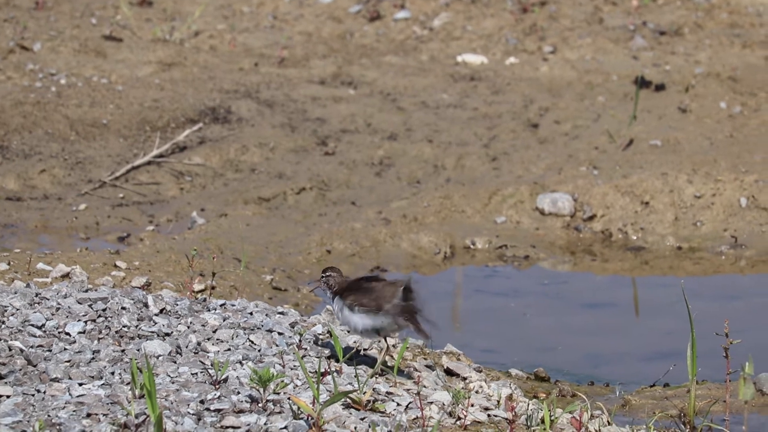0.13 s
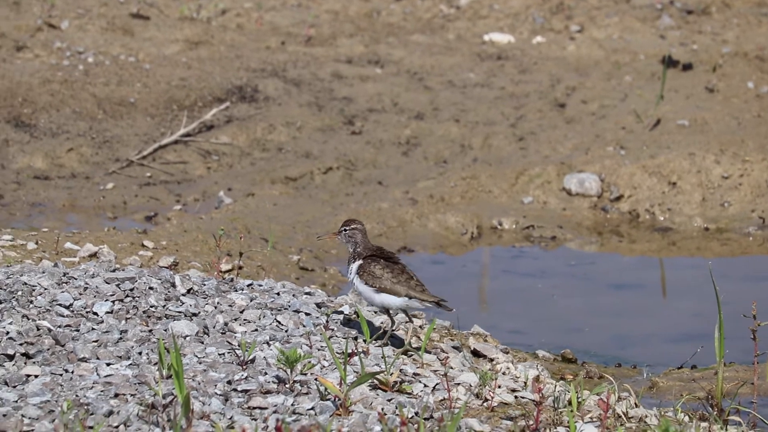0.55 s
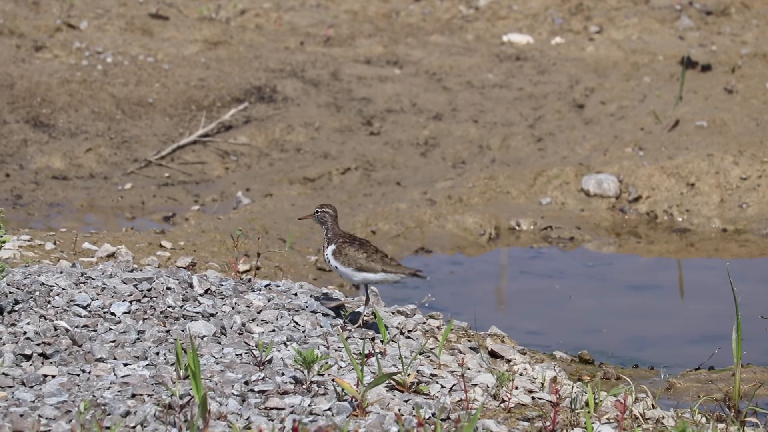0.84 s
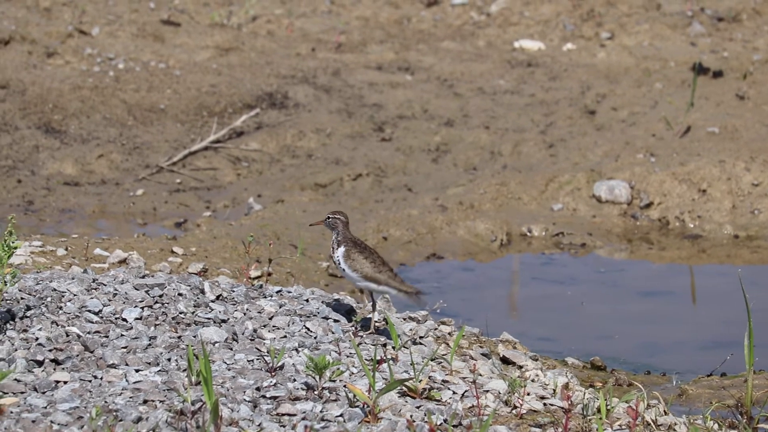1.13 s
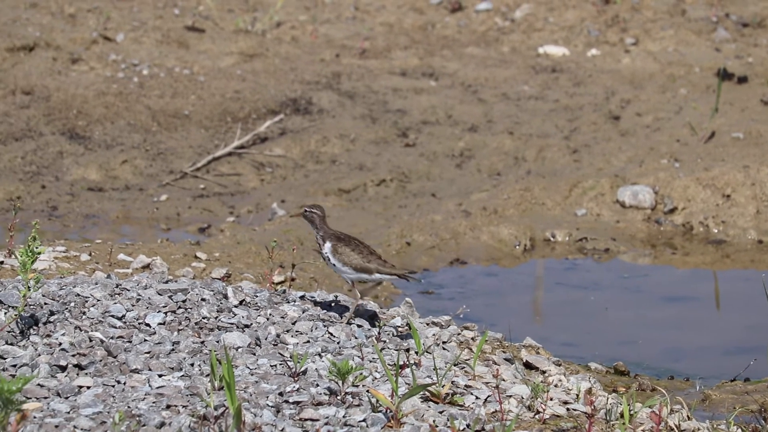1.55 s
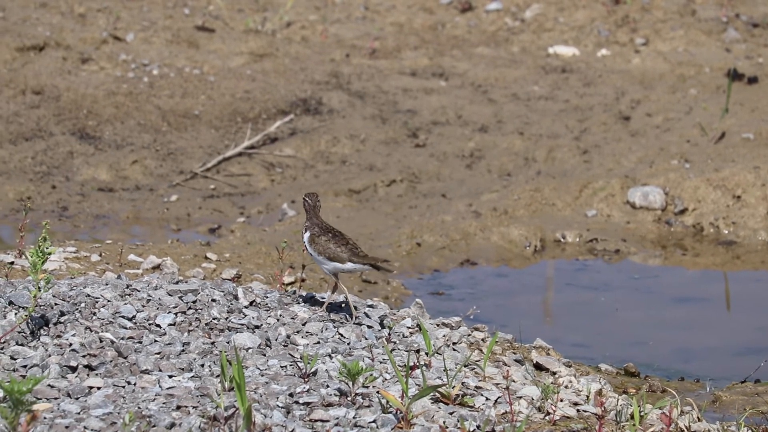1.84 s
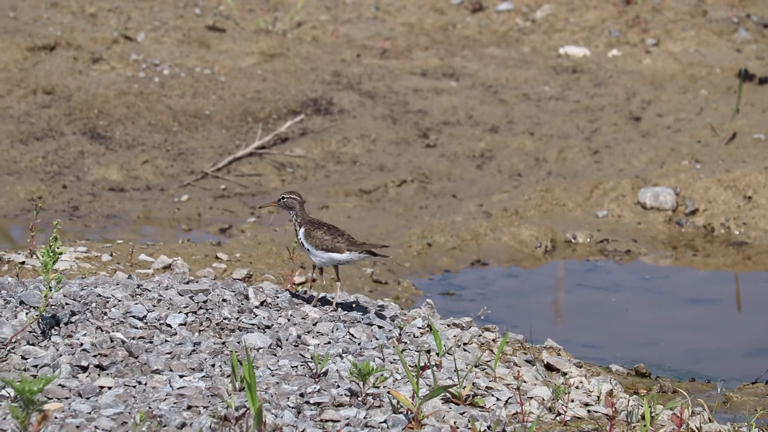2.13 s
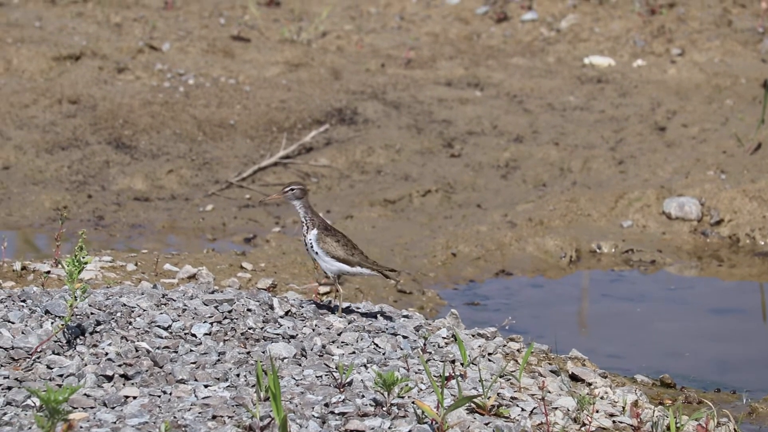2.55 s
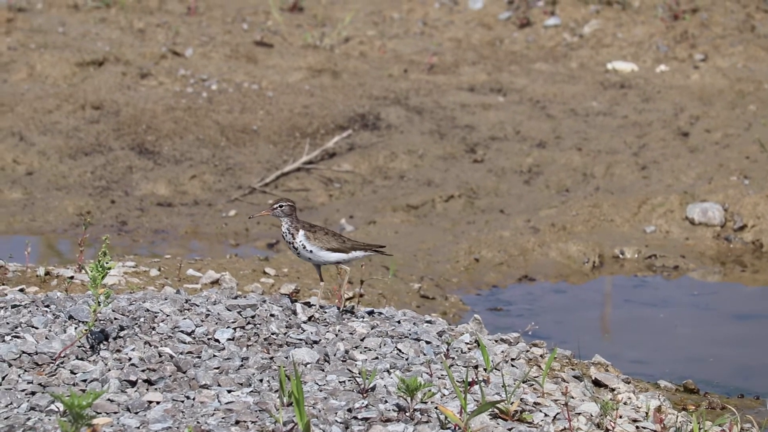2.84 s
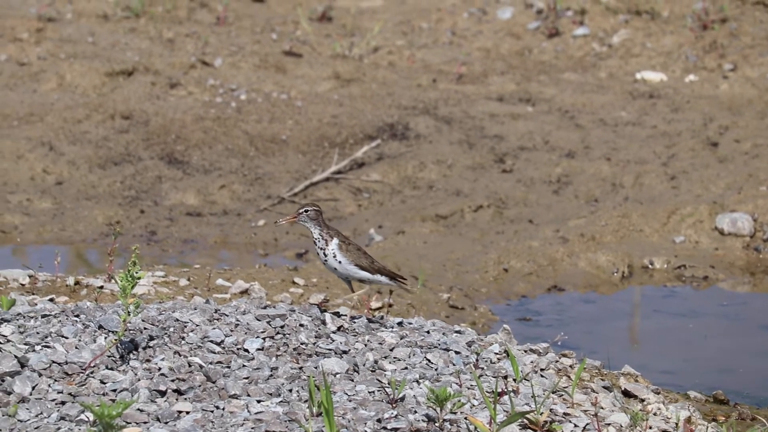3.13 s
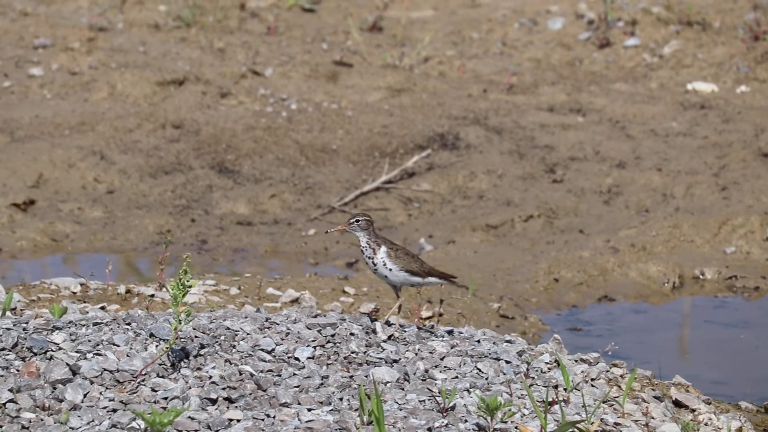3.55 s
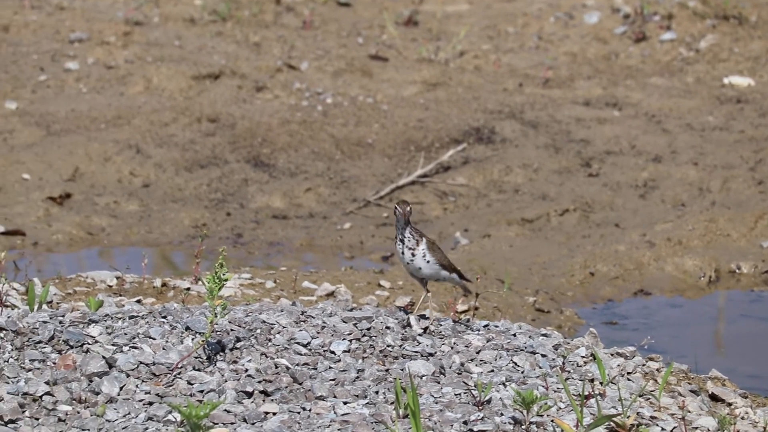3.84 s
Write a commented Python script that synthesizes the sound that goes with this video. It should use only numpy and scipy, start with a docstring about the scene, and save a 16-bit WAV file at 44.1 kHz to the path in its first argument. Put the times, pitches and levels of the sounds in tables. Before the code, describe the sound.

A sandpiper gives brief, pure, rising peeps at about 0.2, 0.5, 0.7, 1.6, 2.0, 2.5, 3.3 and 3.4 seconds, the last ones loudest; the 1.6 peep cracks higher. Distant songbirds make a fast trill from 0.05 to 0.5, a short buzz near 0.95, then scattered slurs and whistles. Thin insect-like chirps repeat over low rumble, hiss and a light breeze easing after 2 seconds.

```python
"""A sandpiper on a gravel bank by a pool gives eight sharp, rising peeps; one cracks briefly into a higher register.
Each peep is three gliding harmonics with a short upward flick at its start and reflections from the bank.
Farther off, songbirds trill, slur and buzz as frequency-swept sines, and a high pulsed chirp repeats like an insect's.
Under them lie a low distant rumble, faint hums, hiss and a light breeze that eases halfway: coloured noise and sines."""
import sys
import numpy as np
from scipy import signal
from scipy.fft import rfft, irfft
from scipy.io import wavfile
from scipy.ndimage import map_coordinates

SR = 44100
rng = np.random.default_rng(int(sys.argv[2]) if len(sys.argv) > 2 else 0)


def master_out(mix):
    """Clip the mix to full scale and print it as 16-bit PCM to the path in sys.argv[1]."""
    frames = np.transpose(np.atleast_2d(mix))
    ceiling = np.clip(frames, -1, 1)
    pcm = np.round(ceiling * 32767).astype(np.int16)
    wavfile.write(sys.argv[1], SR, pcm)


N = 176400  # length in samples: 4 s

# Noise colours, each scaled to rms 1 in use: pitch_hz, relative_level_db
RUMBLE_COLOUR = [(20, -21), (40, -17), (54, -7), (69, 4.5), (92, -5), (125, -4.5), (160, 2), (200, -2),
                 (270, -5.5), (340, -11), (450, -22), (900, -64)]
BREEZE_COLOUR = [(240, -26), (400, -4.5), (834, -3.5), (1630, 1), (2250, 0.5), (4630, -15.5), (6190, -22),
                 (7910, -31.5), (8930, -44), (12700, -45), (15500, -43)]
HISS_COLOUR = [(300, -4), (600, 6), (1000, 1), (2600, -2), (3600, -11), (5000, -15.5), (6500, -22),
               (7400, -13.5), (8200, -14.5), (9200, -24), (10500, -24), (13000, -22.5), (15500, -30.5)]
# Stereo width of the noises: pitch_hz, side_over_mid_db
AIR_WIDTH = [(300, -13), (600, -9), (1200, -3.5), (2400, -5), (4500, -1), (8000, 0.5), (13000, 1.5)]
RUMBLE_WIDTH = [(150, -28), (350, -16)]
# Level of the breeze over time, before its waver: time_s, level_db
BREEZE_LEVEL = [(0, -40), (.4, -44), (.75, -41.5), (1.4, -44.5), (1.9, -41.5), (2.3, -49), (3.2, -53),
                (4, -50.5)]
# Swell added to the rumble's level: time_s, swell_db
RUMBLE_SWELL = [(0, 2.5), (.5, 0), (.85, 2), (1.3, 0.5), (2.5, -1.5), (3.4, -1), (4, 0.5)]
# Faint distant hums: pitch_hz, level_db
HUMS = [(549.1, -63.5), (1658, -63.5)]
RUMBLE_DB, HISS_DB = -36.5, -47.5
BREEZE_PAN_DB, HISS_PAN_DB = -4, 1  # left over right
TOP_HZ = 15700

# Diffuse reflections: decay by 60 dB, time to build up, level against the dry songs
AIR_T60_S, AIR_DELAY_S, SONG_AIR_DB = 0.16, 0.0098, -6.5

# High pulsed chirps: start_s
INSECT_STARTS = [.26, .57, 1.21, 1.51, 1.79, 2.09, 2.38, 2.67, 2.95, 3.22, 3.51, 3.779]
INSECT_LENGTH_S, INSECT_HZ, INSECT_PULSE_HZ, INSECT_DB = 0.09, 7750, 125, -51.5

# Fast trill: start, first step, how much the step shortens by the last note, note length
TRILL_S, TRILL_STEP_S, TRILL_QUICKEN_S, TRILL_NOTE_S = 0.055, 0.0201, 0.0032, 0.018
# Top pitch, depth of fall and level at the first, middle and last note
TRILL_TOP_HZ, TRILL_FALL_HZ, TRILL_DB = [5330, 5300, 5130], [1480, 1400, 850], [-44, -40, -39.5]
TRILL_SCATTER_HZ, TRILL_SCATTER_DB, TRILL_PAN_DB = 35, 1.2, 4
TRILL_ARCH = 0.42  # share of a note spent rising, reached by the last note

# Wavering whistles: start_s, length_s, level_db, pitches_hz at even steps
WARBLES = [(0.565, 0.12, -41, [3200, 3620, 3810, 3880, 4130, 4550, 4470]),
           (2.125, 0.11, -45.5, [3340, 3850, 3860, 3820, 3690, 3600, 3470]),
           (2.382, .135, -44.5, [3590, 3774, 3830, 3740, 3510, 3364, 3350]),
           (2.753, 0.095, -44.5, [3400, 3860, 3930, 4090, 4190, 4030, 3440, 4150])]
# Release is the share of the whistle spent fading
WARBLE_ATTACK_S, WARBLE_RELEASE, WARBLE_PAN_DB = 0.02, 0.38, 8.5

# Songbird notes: start_s, length_s, first_hz, middle_hz, last_hz, level_db, buzz_depth_hz, left_over_right_db
SONG_NOTES = [(0, 0.13, 7630, 8210, 7980, -46.5, 60, 1), (0.082, .13, 8020, 8120, 8500, -48.5, 60, 1),
              (0.207, 0.034, 8800, 9200, 8900, -50.5, 150, 0),
              (0.289, 0.14, 3260, 3910, 4680, -44.5, 0, 8.5), (0.511, 0.033, 4620, 4440, 4230, -40, 304, 4),
              (0.538, 0.026, 3700, 3720, 3480, -38, 2, 14), (0.641, 0.044, 7020, 6240, 5160, -46.5, 1, 14),
              (0.654, 0.13, 6660, 6650, 6050, -46.5, 170, 6), (.772, 0.022, 3530, 3000, 2800, -43.5, 0, 18),
              (0.794, 0.025, 4180, 3840, 3700, -49, 1, 6), (.839, 0.0064, 4900, 5800, 6600, -44, 0, 9),
              (0.845, 0.029, 6600, 7000, 7560, -54, -2, 16), (0.849, 0.28, 9100, 9180, 8580, -55.5, 325, 5),
              (0.854, 0.14, 8600, 8050, 8000, -47.5, 52, 1), (1.051, .2, 9000, 8510, 8700, -56, 260, 2),
              (.998, 0.031, 4773, 4790, 4820, -42, 0, 0), (1.055, 0.021, 3360, 3110, 2870, -49.5, -10, 16),
              (0.983, 0.02, 4370, 3900, 3860, -46, 0, 10), (1.039, 0.0064, 7460, 5770, 4700, -50, 0, 8),
              (1.125, 0.039, 5170, 6600, 7560, -52.5, 3, 15), (1.157, 0.026, 5340, 4100, 3800, -45.5, 7, 9),
              (1.204, 0.016, 5820, 4670, 3600, -47.5, 0, 4), (1.28, 0.19, 3240, 3183, 3280, -50, 45, 20),
              (1.446, 0.043, 5620, 4600, 3680, -41, 124, 6), (1.602, 0.039, 4210, 3860, 3170, -44, 0, 12),
              (1.738, 0.05, 3350, 3800, 4900, -43.5, 2, 9), (1.845, 0.042, 3300, 3850, 4740, -40.5, 0, 10),
              (2.299, 0.031, 8160, 5560, 4300, -49, 0, 9), (2.375, 0.014, 3540, 4100, 4500, -50, 5, 8),
              (2.663, 0.031, 7370, 5270, 4500, -51, 0, 7), (2.741, 0.024, 3400, 4260, 4330, -50, 0, 8),
              (2.79, 0.13, 8300, 8100, 7960, -62.5, 220, 3),
              (2.949, 0.076, 8770, 7650, 7440, -57.5, 220, 3),
              (3.014, 0.061, 6370, 5760, 5300, -55, 156, 5), (3.202, 0.13, 2980, 3107, 3440, -52.5, 50, 8),
              (3.426, 0.068, 6150, 5370, 4700, -52.5, 301, 6),
              (3.577, 0.027, 3200, 3500, 3750, -49.5, 11, 11), (3.671, .1, 5770, 4590, 4180, -51.5, 320, 5),
              (3.786, 0.27, 7750, 8000, 8060, -56.5, 263, 1)]
BUZZ_HZ, BUZZ_UNEVEN, BUZZ_ROUGH = 182, 0.11, 0.28  # vibrato rate, scatter of its rate, roughness per depth
SONG_EDGE = 0.24  # share of a note spent fading in, and out

# A swelling buzz that tightens into a whistle
ZEE_S, ZEE_LENGTH_S, ZEE_FROM_HZ, ZEE_TO_HZ, ZEE_DB = 0.918, 0.083, 4660, 4810, -31.5
ZEE_BUZZ_HZ, ZEE_UNEVEN, ZEE_DEPTH_HZ, ZEE_SETTLE_S = 322, 0.06, 900, 0.023  # uneven: scatter of the rate

# Sandpiper peeps, pitch before scoop and droop:
# start_s, length_s, crest_time_s, open_hz, crest_hz, open_db, crest_db, second_harmonic_db,
# third_harmonic_db, flick_db
PEEPS = [(.237, .058, 0.036, 4400, 4586, -27.5, -26.5, -42, -55, -43),
         (0.537, 0.084, 0.07, 4080, 4776, -28.5, -22, -44, -52, -35),
         (0.711, 0.099, 0.082, 3860, 4690, -33.5, -20, -45, -58, -36.5),
         (1.555, .068, 0.054, 4140, 4390, -25, -20, -47, -59, -41),
         (1.977, 0.073, 0.057, 4140, 4453, -21, -17.5, -47.5, -54, -38.5),
         (2.511, 0.074, 0.048, 4240, 4480, -19, -15, -48, -48, -39.5),
         (3.27, 0.077, 0.064, 4100, 4464, -19, -12, -56, -47, -40.5),
         (3.443, 0.1, .09, 3840, 4630, -23.5, -11, -53, -61, -42)]
# Balance of the three harmonics: left_over_right_db
PEEP_PAN_DB = [0.2, -2.2, -3]
CREST_S, PITCH_RAMP, LEVEL_RAMP = 0.019, 0.46, 0.73  # crest width; shares of the rise made as a steady climb
SCOOP_HZ, SCOOP_S = 480, 0.0023  # each peep slides up from below
DROOP_HZ, DROOP_S = 230, 0.0036  # and hooks down as it ends
ATTACK_S, RELEASE_S = 0.001162, 0.016
JITTER, SHIMMER_DB, OVERTONE_SHIMMER_DB = 0.0017, 1, 1.5  # jitter is a share of the pitch
STEADY_ABOVE_DB, WAVER_PER_DB = -20, 0.16  # a softer voice wavers more
# Upward flick as the voice starts; its overtone is relative to the peep's opening level
FLICK_S, FLICK_FROM_HZ, FLICK_TO_HZ = 0.009, 1650, 3530
FLICK_ROUGH, FLICK_OVERTONE_DB = 0.1, -18
# Jump of register: its two harmonics, and the time to change over
CRACK_S, CRACK_LENGTH_S, CRACK_HZ, CRACK_SAG_HZ = 1.567, 0.015, 5920, 150
CRACK_DB, CRACK_EDGE_S = [-26, -47], 0.0016
STRAIN_HZ, STRAIN_S = 450, 0.006  # the pitch strains upward towards the jump
BANK_ECHO_S, BANK_ECHO_DB, PEEP_AIR_DB = 0.012, -23.5, -22
RIGHT_LAG_S = 1.7e-5  # the near bird reaches the right microphone a little later


def undb(db):
    """Decibels to gain."""
    return 10 ** (np.asarray(db) / 20)


def pan(db):
    """Left and right gains from a left-over-right balance."""
    return undb([[db / 2], [-db / 2]])


def curve(points, at):
    """Straight lines through the points."""
    return np.interp(at, *np.array(points, float).T)


def wander(hz, size):
    """Smooth chance with a spread near 1, drawn afresh hz times a second."""
    knots = rng.standard_normal(int(size * hz / SR) + 4)
    return map_coordinates(knots, [np.arange(size) * hz / SR], mode="mirror")


def ages(length):
    """Time since the start of a sound."""
    return np.arange(int(max(length, 0.002) * SR)) / SR


def gate(age, length, attack, release):
    """Rounded attack, hold, rounded release."""
    rise = np.sin(np.pi / 2 * np.clip(age / attack, 0, 1))
    fall = np.sin(np.pi / 2 * np.clip((length - age) / release, 0, 1))
    return rise * fall


def tone(hz):
    """A sine of rms 1 that follows a pitch."""
    return np.sqrt(2) * np.sin(2 * np.pi * np.cumsum(hz) / SR)


def add(out, start, sound, pan_db):
    """Place a sound in time and between the ears."""
    i = int(np.clip(start * SR, 0, N))
    part = sound[:N - i]
    out[:, i:i + len(part)] += pan(pan_db) * part


def later(x, lag_s):
    """Delay by a fraction of a sample, as a phase slope across the spectrum."""
    hz = np.arange(N // 2 + 1) * SR / N
    return irfft(rfft(x) * np.exp(-2j * np.pi * hz * lag_s), N)


def noise(spectrum, width):
    """Stereo noise, its mid at rms 1, with the given colour and width."""
    log_hz = np.log(np.maximum(np.arange(N // 2 + 1) * SR / N, 1))
    gain, side_gain = (
        undb(curve([(np.log(hz), db) for hz, db in points], log_hz)) for points in (spectrum, width))
    white = rfft(rng.standard_normal((2, N)))
    mid, side = irfft(white * np.array([gain, gain * side_gain]), N)
    return (mid + np.array([side, -side])) / mid.std()


def scatter(x, wet_db):
    """Short diffuse reflections from gravel and banks: a decaying noise tail for each ear."""
    age = ages(2 * AIR_T60_S)
    decay = np.exp(-np.log(1000) * age / AIR_T60_S)
    build_up = np.minimum(age / AIR_DELAY_S, 1)
    tail = rng.standard_normal((len(age), 2)).T * decay * build_up
    tail /= np.sqrt(np.sum(tail ** 2) / 2)  # unit energy per ear
    mono = x.mean(axis=0)[None]
    return undb(wet_db) * signal.fftconvolve(mono, tail, axes=1)[:, :N]


def open_air():
    """Low rumble with faint hums, breeze in the plants, and far hiss."""
    t = np.arange(N) / SR
    out = noise(RUMBLE_COLOUR, RUMBLE_WIDTH) * undb(RUMBLE_DB + curve(RUMBLE_SWELL, t))
    breeze_db = curve(BREEZE_LEVEL, t) + 0.5 * wander(8.64, N)
    out += noise(BREEZE_COLOUR, AIR_WIDTH) * undb(breeze_db) * pan(BREEZE_PAN_DB)
    out += noise(HISS_COLOUR, AIR_WIDTH) * undb(HISS_DB) * pan(HISS_PAN_DB)
    for hz, db in HUMS:
        out += undb(db) * tone(hz * (1 + 0.0029 * wander(6, N)))
    return out


def insect():
    """A thin chirp at a nearly even pace: a wavering high sine chopped into fast pulses."""
    out, age = np.zeros((2, N)), ages(INSECT_LENGTH_S)
    for start in INSECT_STARTS:
        pulses = np.sin(np.pi * INSECT_PULSE_HZ * age) ** 2
        envelope = pulses * gate(age, INSECT_LENGTH_S, 0.033, 0.043)
        hz = INSECT_HZ + 110 * wander(980, len(age))
        add(out, start, undb(INSECT_DB) * envelope * tone(hz), 0)
    return out + scatter(out, SONG_AIR_DB)


def trill():
    """A run of short falling notes that quickens and grows shallower."""
    out, age, start = np.zeros((2, N)), ages(TRILL_NOTE_S), TRILL_S
    for along in np.linspace(0, 1, 23):
        top_hz, fall_hz, db = (
            np.interp(along, [0, 0.5, 1], v) for v in (TRILL_TOP_HZ, TRILL_FALL_HZ, TRILL_DB))
        arch = np.clip(TRILL_ARCH * along ** 2, 0, 0.5)
        pitch_chance, level_chance = rng.standard_normal(2)
        from_top = np.abs((age / TRILL_NOTE_S - arch) / (1 - arch))
        hz = top_hz + TRILL_SCATTER_HZ * pitch_chance - fall_hz * from_top ** 1.58
        size = undb(db + TRILL_SCATTER_DB * level_chance) * gate(age, TRILL_NOTE_S, 0.0077, 0.0063)
        add(out, start, size * tone(hz), TRILL_PAN_DB)
        start += TRILL_STEP_S - TRILL_QUICKEN_S * along
    return out + scatter(out, SONG_AIR_DB)


def warbler():
    """Soft unbroken whistles from the left that bend smoothly through their pitches."""
    out = np.zeros((2, N))
    for start, length, db, pitches in WARBLES:
        age = ages(length)
        place = age / length * (len(pitches) - 1)
        hz = map_coordinates(np.array(pitches, float), [place], mode="nearest")
        envelope = gate(age, length, WARBLE_ATTACK_S, WARBLE_RELEASE * length)
        size = undb(db + wander(113, len(age))) * envelope
        add(out, start, size * tone(hz), WARBLE_PAN_DB)
    return out + scatter(out, SONG_AIR_DB)


def tightening_buzz():
    """A swelling note whose wide, fast vibrato dies away to leave a whistle."""
    out, age = np.zeros((2, N)), ages(ZEE_LENGTH_S)
    glide_hz = ZEE_FROM_HZ + (ZEE_TO_HZ - ZEE_FROM_HZ) * age / ZEE_LENGTH_S
    rate_hz = ZEE_BUZZ_HZ * (1 + ZEE_UNEVEN * wander(ZEE_BUZZ_HZ, len(age)))
    vibrato = tone(rate_hz) / np.sqrt(2)
    hz = glide_hz + ZEE_DEPTH_HZ * np.exp(-age / ZEE_SETTLE_S) * vibrato
    envelope = gate(age, ZEE_LENGTH_S, 0.05, 0.0085) ** 2
    add(out, ZEE_S, undb(ZEE_DB) * envelope * tone(hz), pan_db=4.5)
    return out + scatter(out, SONG_AIR_DB)


def songbirds():
    """Distant notes gliding on a parabola of pitch, some buzzing with a fast vibrato."""
    out = np.zeros((2, N))
    for start, length, first_hz, middle_hz, last_hz, db, buzz_hz, pan_db in SONG_NOTES:
        age = ages(length)
        glide = np.polyfit([0, 0.5, 1], [first_hz, middle_hz, last_hz], 2)
        vibrato = tone(BUZZ_HZ * (1 + BUZZ_UNEVEN * wander(80, len(age)))) / np.sqrt(2)
        buzz = vibrato + BUZZ_ROUGH * wander(900, len(age))
        hz = np.polyval(glide, age / length) + buzz_hz * buzz
        envelope = gate(age, length, SONG_EDGE * length, SONG_EDGE * length)
        size = undb(db + 0.86 * wander(113, len(age))) * envelope
        add(out, start, size * tone(hz), pan_db)
    return out + scatter(out, SONG_AIR_DB)


def crack_gate(age):
    """Opens while the voice sits in its higher register."""
    return gate(age, CRACK_LENGTH_S, CRACK_EDGE_S, CRACK_EDGE_S)


def add_crack(out):
    """The higher register: two harmonics sagging slightly in pitch."""
    age = ages(CRACK_LENGTH_S)
    hz = CRACK_HZ - CRACK_SAG_HZ * age / CRACK_LENGTH_S
    for k, db in enumerate(CRACK_DB):
        add(out, CRACK_S, undb(db) * crack_gate(age) * tone((k + 1) * hz), PEEP_PAN_DB[k])


def add_flick(out, start, flick_db, open_db):
    """A rough, accelerating upward sweep with an overtone, ending as the peep's attack ends."""
    age = ages(FLICK_S)
    sweep_hz = FLICK_FROM_HZ * (FLICK_TO_HZ / FLICK_FROM_HZ) ** ((age / FLICK_S) ** 2)
    hz = sweep_hz * (1 + FLICK_ROUGH * wander(1580, len(age)))
    flick = undb(flick_db) * tone(hz) + undb(open_db + FLICK_OVERTONE_DB) * tone(2 * hz)
    add(out, start + ATTACK_S - FLICK_S, flick * gate(age, FLICK_S, FLICK_S / 2, ATTACK_S), 0)


def sandpiper():
    """Nearly pure whistles: a flick, a climb to a louder crest, a quick droop."""
    out = np.zeros((2, N))
    for (start, length, crest, open_hz, crest_hz, open_db, crest_db,
         second_db, third_db, flick_db) in PEEPS:
        age = ages(length)
        climb = np.minimum(age / crest, 1)
        hump = np.exp(-((age - crest) / CREST_S) ** 2)
        hz = open_hz + (crest_hz - open_hz) * (PITCH_RAMP * climb + (1 - PITCH_RAMP) * hump)
        hz = hz - SCOOP_HZ * np.exp(-age / SCOOP_S) - DROOP_HZ * np.exp((age - length) / DROOP_S)
        since_crack = start + age - CRACK_S
        hz = hz + STRAIN_HZ * np.exp(-np.abs(since_crack) / STRAIN_S)
        hz = hz * (1 + JITTER * wander(700, len(age)))
        db = open_db + (crest_db - open_db) * (LEVEL_RAMP * climb + (1 - LEVEL_RAMP) * hump)
        # the normal register falls silent during the crack
        envelope = gate(age, length, ATTACK_S, RELEASE_S) * (1 - crack_gate(since_crack))
        shimmer_db = SHIMMER_DB + WAVER_PER_DB * np.maximum(STEADY_ABOVE_DB - db, 0)
        levels = [db + shimmer_db * wander(170, len(age)),
                  second_db + OVERTONE_SHIMMER_DB * wander(250, len(age)),
                  third_db + OVERTONE_SHIMMER_DB * wander(250, len(age))]
        for k, (level_db, pan_db) in enumerate(zip(levels, PEEP_PAN_DB)):
            add(out, start, envelope * undb(level_db) * tone((k + 1) * hz), pan_db)
        add_flick(out, start, flick_db, open_db)
    add_crack(out)
    add(out, BANK_ECHO_S, undb(BANK_ECHO_DB) * out.mean(axis=0), 0)
    direct = np.array([out[0], later(out[1], RIGHT_LAG_S)])
    return direct + scatter(out, PEEP_AIR_DB)


def scene():
    """The near bird over its surroundings."""
    far_birds = trill() + warbler() + tightening_buzz() + songbirds()
    return open_air() + insect() + far_birds + sandpiper()


def record(dry):
    """The recorder cuts the top with a steep low-pass."""
    return signal.sosfilt(signal.ellip(10, 0.1, 80, TOP_HZ, fs=SR, output="sos"), dry)


dry = scene()
out = record(dry)
master_out(out)
```